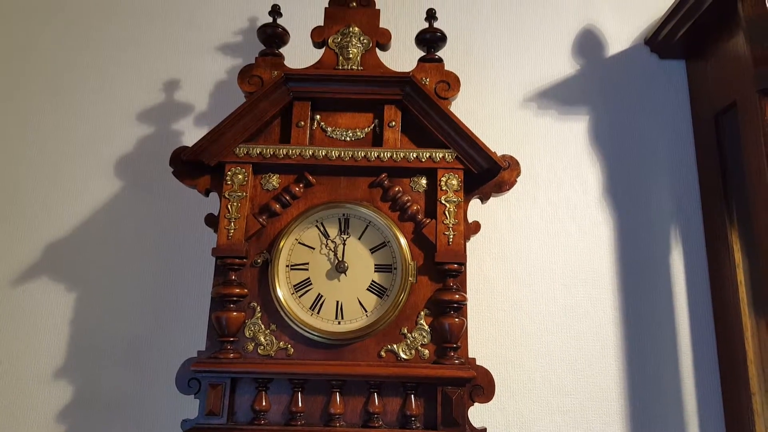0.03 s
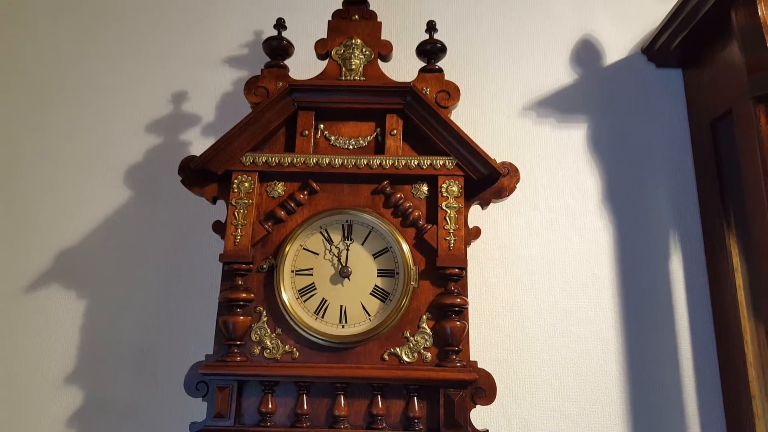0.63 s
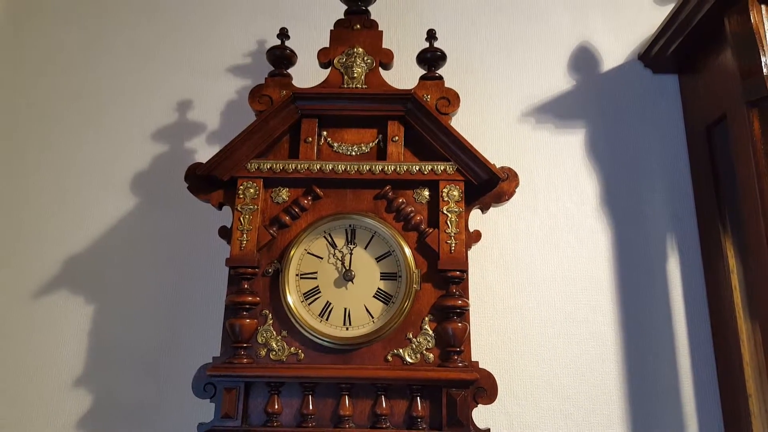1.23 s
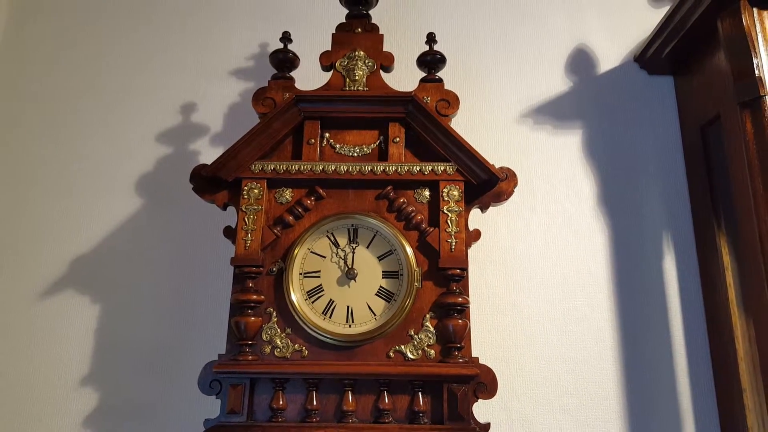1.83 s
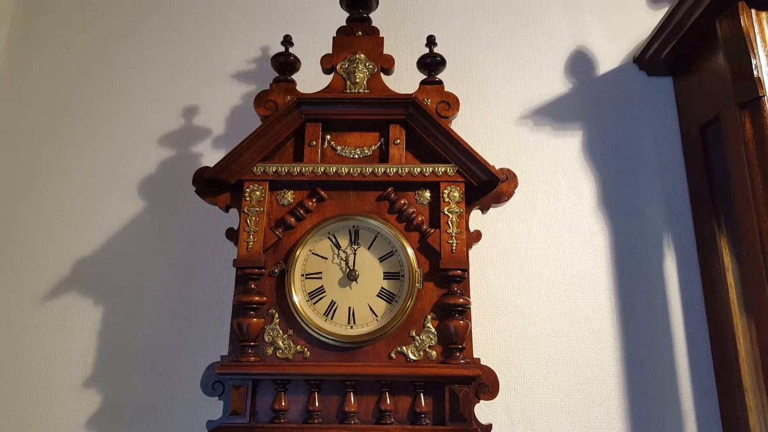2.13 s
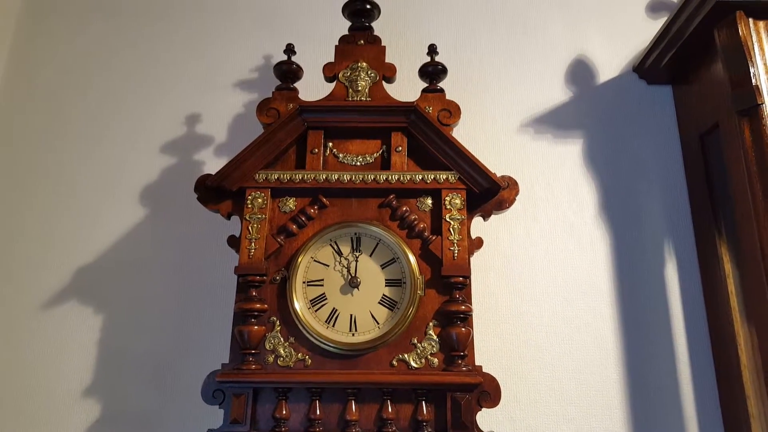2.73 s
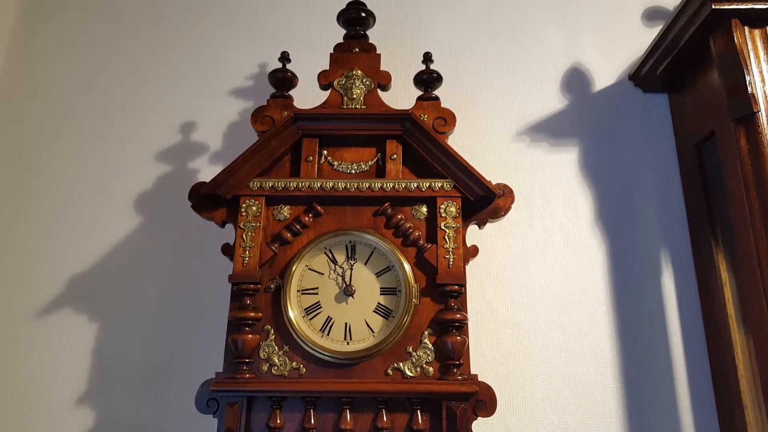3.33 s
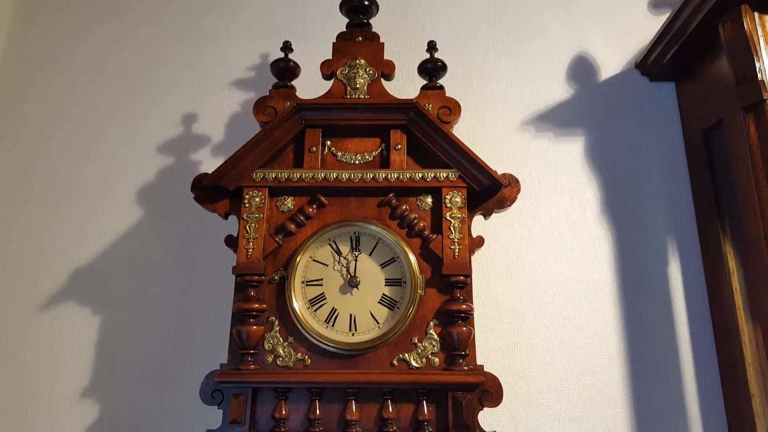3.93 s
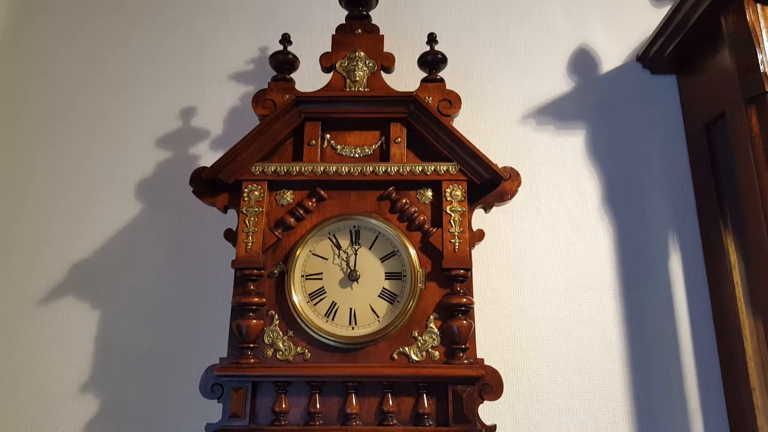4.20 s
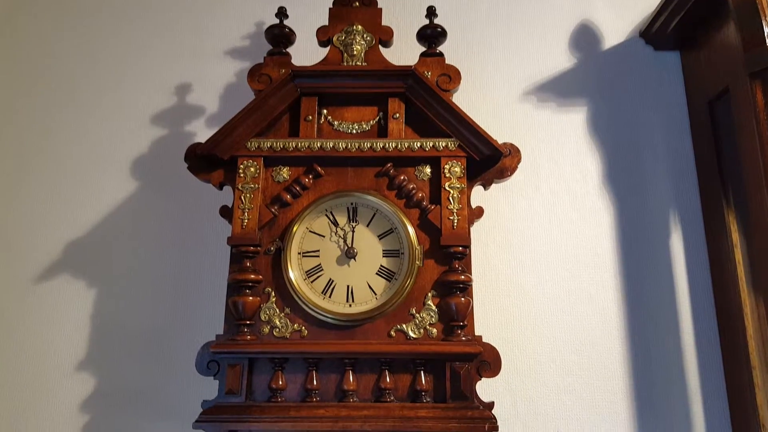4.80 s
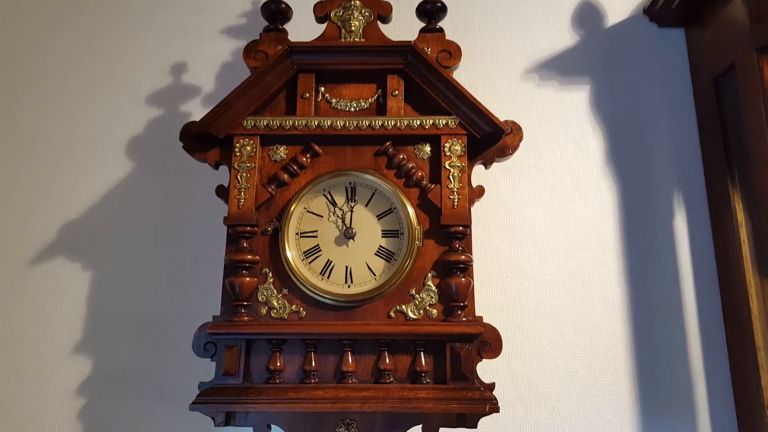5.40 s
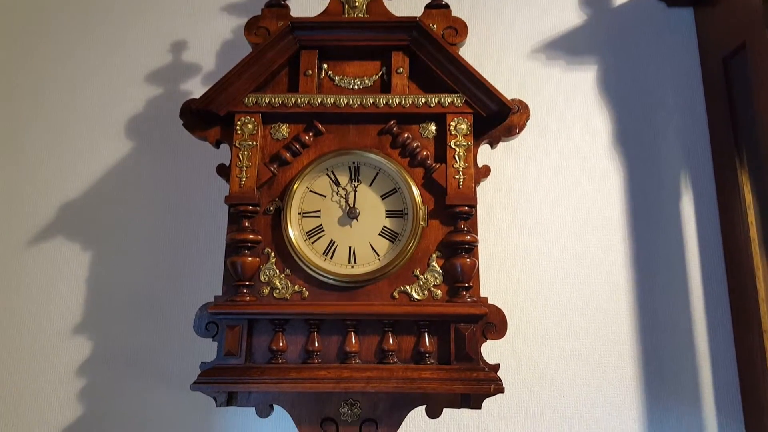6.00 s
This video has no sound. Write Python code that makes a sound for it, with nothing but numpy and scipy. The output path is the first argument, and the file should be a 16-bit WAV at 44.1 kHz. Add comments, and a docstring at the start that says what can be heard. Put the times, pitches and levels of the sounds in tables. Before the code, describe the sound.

Five evenly spaced metallic strikes ring from a wall clock over soft ticks and whirring gears, then the mechanism clicks to a stop.

```python
"""A wooden wall clock strikes the hour on a coiled wire gong, heard in stereo in a quiet room.
At first earlier blows still ring, the striking train whirs and the escapement ticks with the pendulum.
Five times the hammer lifts, clicks free and hits the coil; the case thuds, and the coil's paired modes
beat and ring on into the next blow. At last a lever drops with two clicks and stops the train,
while the gong decays and the ticking goes on."""
import sys
import numpy as np
from scipy import signal
from scipy.fft import rfft, irfft, next_fast_len
from scipy.io import wavfile
from scipy.ndimage import map_coordinates

SR = 44100
rng = np.random.default_rng(int(sys.argv[2]) if len(sys.argv) > 2 else 0)


def transcribe(u):
    """Save the signal u as a 16-bit wav file named by the first command-line argument.

    u: samples, shape (n,) or (channels, n), limited to [-1, 1]; the rate is SR.
    q: integer samples, one column per channel.
    """
    v = np.clip(np.atleast_2d(u).T, -1, 1)
    q = np.round(v * 32767).astype(np.int16)
    wavfile.write(sys.argv[1], SR, q)


N = 271215
T = np.arange(N) / SR
SIDES = np.array([[1], [-1]])  # left, right

# hammer blows: start_s, strength_db, fall_s, release_click_db, ping_hz, ping_db
BLOWS = [(.213, 0.52, 0.037, -34.5, 9900, -4), (1.465, 0.3, .038, -35.5, 9250, 8),
         (2.756, 0.38, 0.036, -32, 9900, 8.5), (4.038, 0, .018, -31.5, 9900, 4.5),
         (5.302, .8, 0.018, -31.5, 9180, 4)]
# spectrum of metal impacts in the clockwork: frequency_hz, density_db, t60_s
IMPACT_SPECTRUM = [(200, -20.5, .3), (900, -6, 0.33), (2200, 1, .3), (3200, -1, 0.27), (5000, -8, 0.31),
                   (7000, -9, .25), (11000, -12, .22), (15500, -19, .2)]


def undb(db):
    """Decibels to amplitude ratio."""
    return 10 ** (np.asarray(db) / 20)


def along(table, hz):
    """Columns of a table interpolated at hz on a log-frequency axis."""
    at, *columns = np.transpose(table)
    return [np.interp(np.log(np.maximum(hz, 1)), np.log(at), c) for c in columns]


def drift(rate_hz):
    """Smooth random modulation with a spread near 1."""
    points = rng.standard_normal(int(N / SR * rate_hz) + 4)
    coarse = map_coordinates(points, [T[::64] * rate_hz + 1], order=3, mode="nearest")
    return np.interp(T, T[::64], coarse)


def add(out, sound, start_s):
    """Superposition: mix a sound in from start_s on."""
    start = int(round(start_s * SR))
    lo, hi = max(start, 0), min(start + sound.shape[1], N)
    if hi > lo:
        out[:, lo:hi] += sound[:, lo - start:hi - start]


def noise(spectrum, size, apart_hz=800):
    """Diffuse field: coloured noise of rms 1, whose long waves are alike on left and right."""
    hz = np.arange(size // 2 + 1) * SR / size
    mid, side = rfft(rng.standard_normal((2, size)))
    width = hz / np.hypot(hz, apart_hz)
    stereo = (mid + SIDES * width * side) / np.hypot(1, width)
    x = irfft(stereo * undb(along(spectrum, hz)[0]), size)
    return x / x.std()


def burst(spectrum, size, tilt_db_per_octave=0):
    """Modal overlap: dense resonances merge into noise, each frequency decaying at its own rate."""
    hz, s, frames = signal.stft(noise(spectrum, size), SR, nperseg=512)
    tilt = undb(tilt_db_per_octave * np.log2(np.maximum(hz, 200) / 3000))
    fade = undb(-60 * s / along(spectrum, hz)[1][:, None])
    return signal.istft(frames * fade * tilt[:, None], SR, nperseg=512)[1][:, :size]


def reverberate(x, wet_db, t60_s):
    """Reverberation: dense reflections decay exponentially, uncorrelated on left and right."""
    t = T[:SR // 2]
    tail = rng.standard_normal((2, len(t))) * undb(-60 * t / t60_s) * (t > .004)
    tail /= np.sqrt((tail ** 2).sum(axis=1, keepdims=True))
    reflections = signal.fftconvolve(x, tail, axes=1)[:, :N]
    return (x + undb(wet_db) * reflections) / np.hypot(1, undb(wet_db))


def room(level_db=-60):
    """Ambient noise: a steady diffuse field, strongest in the bass."""
    # room spectrum: frequency_hz, density_db
    spectrum = [(20, -30), (40, -11), (55, 2), (85, -13.5), (120, -14.5), (170, -14.5), (400, -9.5),
                (1000, -20), (3000, -26.5), (8000, -37), (16000, -37)]
    return undb(level_db) * noise(spectrum, next_fast_len(N))[:, :N]


def strokes(earlier=2, period_s=1.272):
    """Repeated excitation, led by blows before time zero: start_s, strength_db, ping_hz, ping_db."""
    blows = [(s, db, ping_hz, ping_db) for s, db, _, _, ping_hz, ping_db in BLOWS]
    first_s, *alike = blows[0]
    return [(first_s - k * period_s, *alike) for k in range(earlier, 0, -1)] + blows


def excitation_db(hz, start_s, ping_hz, ping_db, shift_at_s=2.4, shift_s=1.1, ping_octaves=.018):
    """Modal excitation: the timbre shifts once, slowly, and a high ping depends on how the hammer lands."""
    # bands that shift in level: centre_hz, width_octaves, early_db, late_db
    bands = [(1213, .03, -1.5, 2), (1724, 0.0086, 3.5, -5), (2600, .14, 6.5, .5), (3730, .08, -3.5, 2),
             (4230, .025, -2, -4), (4390, .025, -2, 3), (5200, .08, 6, 2), (9900, 0.023, -4.5, -6)]
    near = lambda centre, width: np.exp(-(np.log2(hz / centre) / width) ** 2)
    late = (1 + np.tanh((start_s - shift_at_s) / shift_s)) / 2
    shift = sum(((1 - late) * early_db + late * late_db) * near(centre, width)
                for centre, width, early_db, late_db in bands)
    return shift + ping_db * near(ping_hz, ping_octaves)


def ring(modes, swell_s, first_share, sway_db, gain_db):
    """Damped free vibration: each blow adds to what still rings, swelling as case and room respond."""
    hz, db, t60, pan_db, lead = np.transpose(modes)
    pole = 2j * np.pi * hz - np.log(1000) / t60
    # a decaying tone is its state at the start of each block times its course within the block
    starts = np.exp(np.outer(T[:int(t60.max() * SR):512], pole))
    within = np.exp(np.outer(pole, T[:512]))
    t = np.arange(len(starts) * within.shape[1]) / SR
    swell = 1 - (1 - first_share) * np.exp(-t / swell_s)
    phase = 2 * np.pi * rng.random(len(hz)) + SIDES * lead / 2
    heard = undb(db + gain_db + SIDES * pan_db / 2) * np.exp(1j * phase)
    out = np.zeros((2, N))
    for s, blow_db, ping_hz, ping_db in strokes():
        # the microphone drifts through the room's standing waves, which matters more for short waves
        sway = sway_db * np.minimum(hz / 2000, 1) * rng.standard_normal((2, len(hz)))
        amplitudes = heard * undb(blow_db + excitation_db(hz, s, ping_hz, ping_db) + sway)
        tones = np.array([((starts * side) @ within).real.ravel() for side in amplitudes])
        add(out, swell * tones, s)
    return out


def coil():
    """Beating: the struck coil has inharmonic modes, many in pairs a few hertz apart."""
    # coil modes: pitch_hz, level_db, t60_s, left_minus_right_db, left_lead_rad
    modes = [(224, -46.5, 3.87, 0.0, 0.4), (267.9, -50.5, 6.7, 0, -0.35), (318.8, -31.5, 2.37, 0.0, 0.2),
             (372.36, -23, 2.48, 0.5, -0.0), (432, -48, 9.1, -3, 0.0), (492.8, -40.5, 7.3, -6.5, 0.7),
             (557.4, -38, 6.6, -5.5, 0.24), (563, -38.5, 4.5, -6, 1.1), (626.88, -33.5, 5.6, -6, 1.0),
             (632.5, -35, 4.3, -5.5, 2.4), (699.4, -42.5, 7, 6, 0.54), (705.5, -35.5, 6, 6, 0.93),
             (773.5, -30, 6.9, 2.0, 0.0), (781.8, -28.5, 5.6, -1, 0.05), (851.95, -34.5, 4.9, -0.5, -1.5),
             (858, -39.0, 5.5, 4.5, -2.5), (935.12, -34.5, 5.7, 0.5, 3), (1022.7, -33.4, 2.86, 5.0, -1.6),
             (1109.75, -19.5, 1.1, 3.5, -0.9), (1119.3, -26, 3.4, 7.5, -2.5),
             (1203.3, -20, 1.61, -8.5, 2.5), (1213.3, -20.5, 4.15, -2.5, 1.88),
             (1298, -31.5, 2.66, 5.5, 1.1), (1308, -38.5, 3.8, 6, -1), (1398, -30.8, 1.95, -2, -0.1),
             (1495, -42, 3.7, -3, 1.3), (1509, -38, 4.15, 7, -2), (1621, -33, 2.1, 6.5, 2),
             (1714, -27, 1.69, -9.5, 0.77), (1729.07, -36, 3.8, -4.5, 0.92), (1828, -33.5, 1.45, -1, -0.7),
             (1956, -42, 2.7, -2, -1), (2086, -29, 0.79, 2, -0.5), (2182.81, -32.5, 0.77, -7.0, 1.8),
             (2205, -26, 1.1, -7, 2.0), (2310, -35.5, 1.06, -8, 0), (2320, -33.5, 1.35, 1, -2.5),
             (2440, -37.0, 0.68, -10, 1), (2451, -28, 0.93, -10, 1.57), (2585, -34, 0.42, -2, 0.5),
             (2845, -35, 0.46, -1, -1.8), (2875, -30, 0.39, -3, -1.0), (3005, -32, 0.61, 2, -0.5),
             (3164, -31.5, 0.74, -8, 2.2), (3440.06, -38, 0.98, -6, 2.3), (3563.89, -36.5, 0.98, 3, -1.3),
             (3591, -35, 0.91, -13.5, 0.6), (3717, -42.5, 1.15, 0.0, 1.0), (3770, -42, 1.3, 4, 2),
             (3911.67, -40, 1.52, 4.5, -0.7)]
    return ring(modes, swell_s=.015, first_share=.21, sway_db=1, gain_db=0)


def panels():
    """Resonance: each blow sets the wooden case ringing at its own natural frequencies."""
    # case modes: pitch_hz, level_db, t60_s, left_minus_right_db, left_lead_rad
    modes = [(208.7, -49.5, 3.05, 0, 0), (406, -39, 1, 0, 0), (462.3, -31, 0.69, -1, 0),
             (540.7, -41.5, 2.6, -4, 0), (591, -41.5, 1.4, -3, 0), (748, -34, 0.97, 0, .5),
             (1057, -35, 1.1, 1, -1), (1068, -39, 1.4, 0, -1), (1677, -35, .7, -3, 1),
             (3120, -38, .9, 2, 1), (3292, -43, 1.3, -3, 0)]
    return ring(modes, swell_s=.015, first_share=.44, sway_db=.5, gain_db=.5)


def shimmer(scatter_db=1.5, twin_db=-5, twin_spread=.00121):
    """Dispersion: stiffness spreads the wire's high modes; each has a twin from the coil's other plane."""
    # envelope of the high modes: frequency_hz, level_db, t60_s, left_minus_right_db
    envelope = [(4000, -48.5, 1.4, -1), (4390, -41.5, 1.47, -1.5), (4820, -48, 0.83, -5),
                (5200, -42, 0.61, 0), (6100, -46.5, 0.67, -2), (6860, -39.5, 0.58, 0),
                (7540, -49.5, 0.54, -1), (8440, -55, .4, 4), (9190, -39.5, 0.45, 5), (9700, -42, .45, 8),
                (9900, -31, 0.41, 9.5), (10300, -40, 0.36, 6), (10700, -45, 0.41, 5),
                (12200, -43.5, 0.36, 5), (14700, -51.5, 0.42, 4), (15600, -66, .35, 5)]
    n = np.arange(49)
    upper_hz = 4074 + 168 * n + 1.43 * n ** 2
    twin_ratio = .992 + twin_spread * rng.standard_normal(len(n))
    hz = np.concatenate([upper_hz, upper_hz * twin_ratio])
    db, t60, pan_db = along(envelope, hz)
    scatter, lead = rng.standard_normal((len(hz), 2)).T
    db = db + scatter_db * scatter + np.repeat([0, twin_db], len(n))
    modes = np.transpose([hz, db, t60, pan_db, 2 * lead])
    direct = ring(modes, swell_s=.0055, first_share=.45, sway_db=2.2, gain_db=1)
    return reverberate(direct, wet_db=-3, t60_s=.2)


def striking_train(level_db=-47, load_db=4, flutter_db=2.1, surge_db=.9, easing_db_per_s=-.47,
                   lift_s=.31, lift_width_s=.29, end_s=5.76, stop_s=.043):
    """Modulated noise: wheels and air brake whir, louder as they start to lift the hammer, until stopped."""
    # whir spectrum: frequency_hz, density_db
    spectrum = [(200, -10), (800, 0), (1450, 0.5), (1950, 4), (2300, -5), (2800, -11), (3150, -4),
                (3800, -14), (4800, -15), (7000, -12.5), (8600, -22), (10500, -14), (13000, -26.5),
                (16000, -29)]
    running = np.exp(-np.maximum(T - end_s, 0) / stop_s)
    load = sum(np.exp(-((T - s - lift_s) / lift_width_s) ** 2) for s, *_ in BLOWS)
    whir = noise(spectrum, next_fast_len(N))[:, :N]
    whir = reverberate(whir, wet_db=-2, t60_s=.045)  # narrow resonances of the closed case
    unsteady_db = flutter_db * drift(130) + surge_db * drift(5.04)
    return whir * running * undb(level_db + easing_db_per_s * T + load_db * load + unsteady_db)


def clicks(events, rise_s, snap_s, tail_db):
    """Impulse response: steel meets brass with a short snap, then case and room ring."""
    out, t = np.zeros((2, N)), T[:SR // 3]
    envelope = (1 - np.exp(-t / rise_s)) * (np.exp(-t / snap_s) + undb(tail_db))
    for s, db, tilt in events:
        add(out, undb(db) * burst(IMPACT_SPECTRUM, len(t), tilt) * envelope, s)
    return out


def escapement(first_s=.015, beat_s=.5243, level_db=-41, scatter_db=1, tilt_db_per_octave=-.7):
    """Isochronism: the pendulum's equal swings give evenly spaced ticks."""
    ticks = [(s, level_db + scatter_db * rng.standard_normal(), tilt_db_per_octave)
             for s in np.arange(first_s, N / SR, beat_s)]
    return clicks(ticks, rise_s=.001, snap_s=.01, tail_db=-11.5)


def hammer_lift(pitch_hz=430, level_db=-46, ahead_s=.11, width_s=.048):
    """Elastic vibration: the hammer's spring hums briefly as it is drawn back before each blow."""
    swell = sum(np.exp(-((T - s + ahead_s) / width_s) ** 2) for s, *_ in BLOWS)
    return undb(level_db) * swell * np.sin(2 * np.pi * pitch_hz * T + drift(11))


def hammer_release(again_s=.02, tilt_db_per_octave=-3):
    """Sudden release: the hammer clicks off its pin, and its tail clicks again if the fall is long."""
    slips = [(s - fall_s + delay_s, db, tilt_db_per_octave)
             for s, _, fall_s, db, *_ in BLOWS
             for delay_s in (0, again_s) if delay_s < fall_s]
    return clicks(slips, rise_s=.0013, snap_s=.013, tail_db=-12.5)


def hammer_impact(crack_db=-25, crack_s=.013, thud_db=-25, wash_db=-35, swell_s=.013):
    """Broadband excitation: the hammer cracks on the wire, the case thuds and a soft wash lingers."""
    # case and room after a blow: frequency_hz, density_db, t60_s
    thud = [(60, -24, 1.2), (130, -24, 1.0), (220, -14.5, 1.4), (400, 1, 0.85), (600, -1, 0.79),
            (850, -1.5, 0.74), (1100, -4.5, .8), (1710, -1.5, .7), (2600, -3, .5), (4000, -12.5, 0.66),
            (7000, -24, 0.71), (15000, -37, .4)]
    # wash between the gong's tones: frequency_hz, density_db, t60_s
    wash = [(150, -35, 3), (240, -7.5, 3.9), (400, -1.5, 4.8), (800, -0.5, 4.6), (1100, -0.5, 3.8),
            (1700, -2, 3.7), (2300, -7, 2.6), (3200, -10.5, 2.1), (4200, -9.5, 1.9), (6000, -24, 1.3),
            (15000, -45, 1)]
    out, t = np.zeros((2, N)), T[:2 * SR]
    snap = np.exp(-t[:SR // 10] / crack_s)
    swell = 1 - np.exp(-t / swell_s)
    for s, blow_db, *_ in strokes(earlier=1):
        add(out, undb(blow_db + crack_db) * noise(IMPACT_SPECTRUM, len(snap)) * snap, s)
        add(out, undb(blow_db + thud_db) * burst(thud, SR) * swell[:SR], s)
        add(out, undb(blow_db + wash_db) * burst(wash, len(t)) * swell, s)
    return out


def stop_lever():
    """Impact transients: the lever drops, then catches the train to end the hour."""
    # drop and catch: start_s, level_db, tilt_db_per_octave
    impacts = [(5.715, -24, -.5), (5.7594, -24.5, -2.5)]
    return clicks(impacts, rise_s=.0013, snap_s=.013, tail_db=-12.5)


def scene():
    """Superposition: gong, case and clockwork add to the room's ambient noise."""
    strikes = coil() + panels() + shimmer() + hammer_impact()
    clockwork = escapement() + hammer_release() + stop_lever() + hammer_lift() + striking_train()
    return strikes + clockwork + room()


def record(dry):
    """Band limiting: a steep elliptic low-pass removes the highest treble."""
    cutoff_hz = 15900
    return signal.sosfilt(signal.ellip(10, .2, 80, cutoff_hz, fs=SR, output="sos"), dry)


dry = scene()
out = record(dry)
transcribe(out)
```